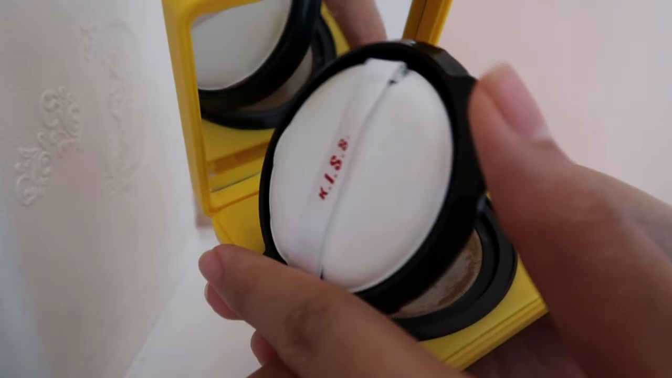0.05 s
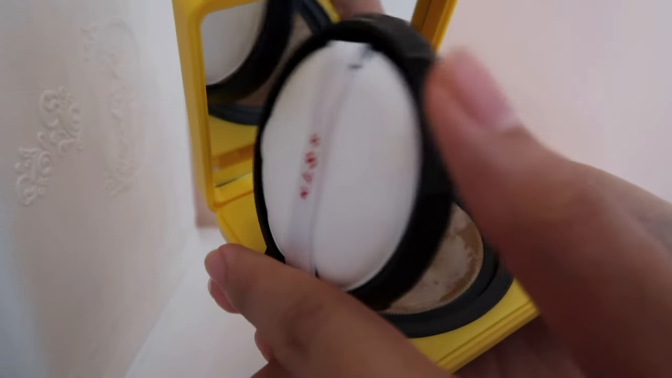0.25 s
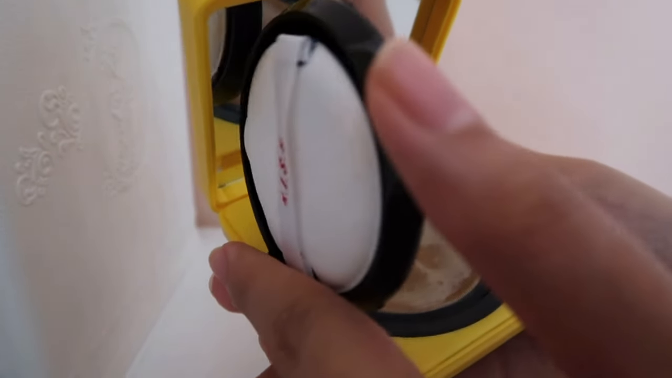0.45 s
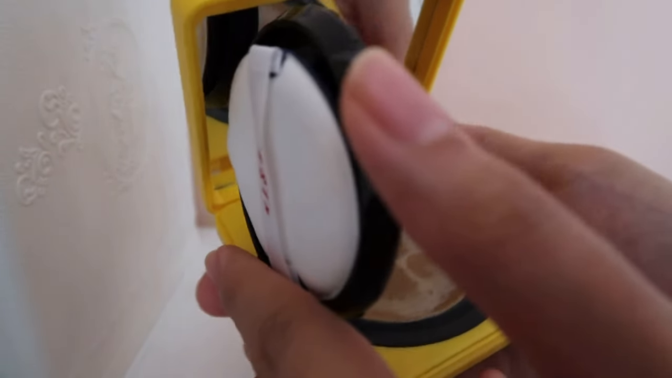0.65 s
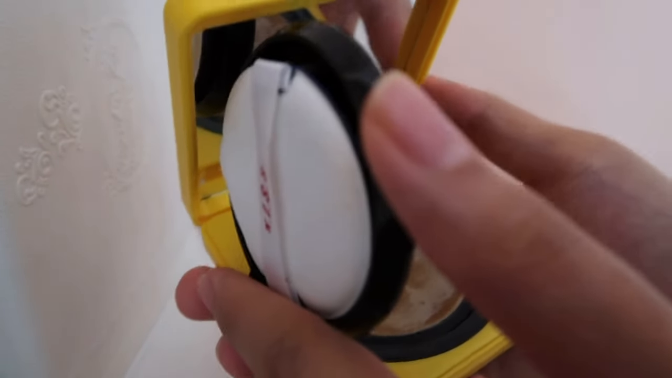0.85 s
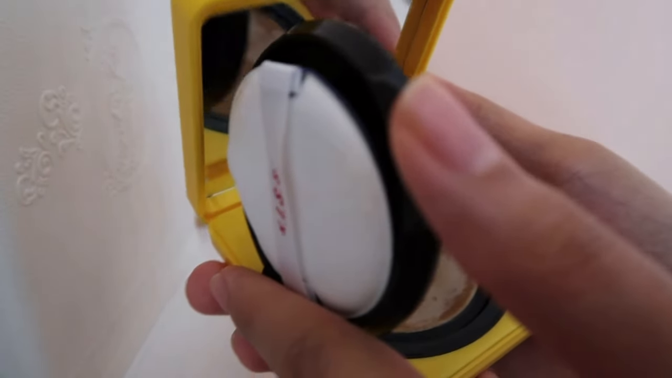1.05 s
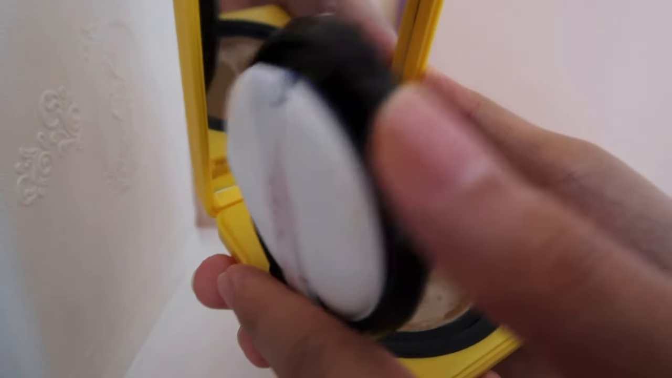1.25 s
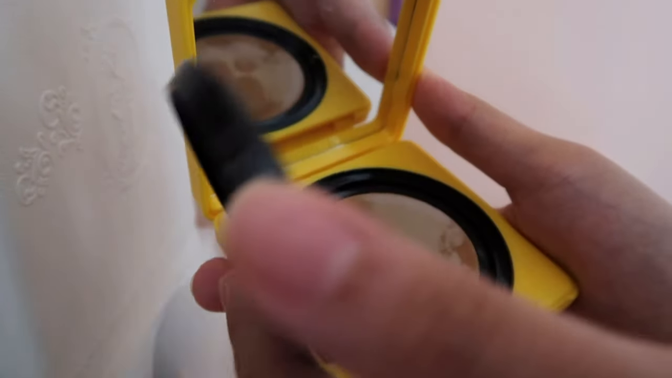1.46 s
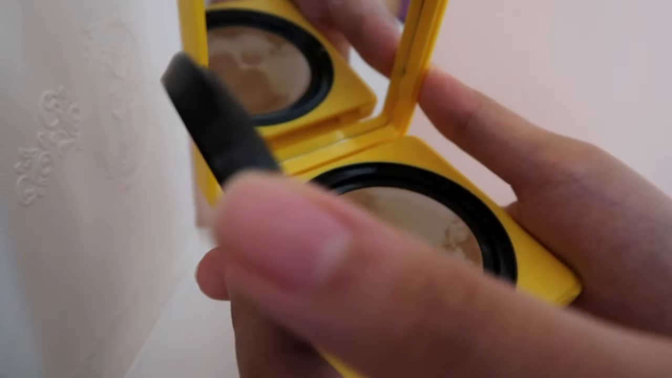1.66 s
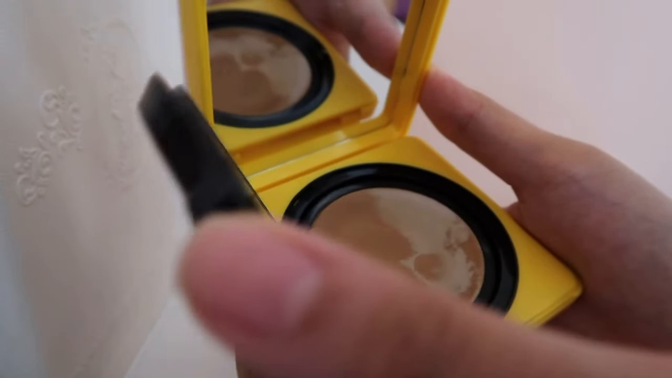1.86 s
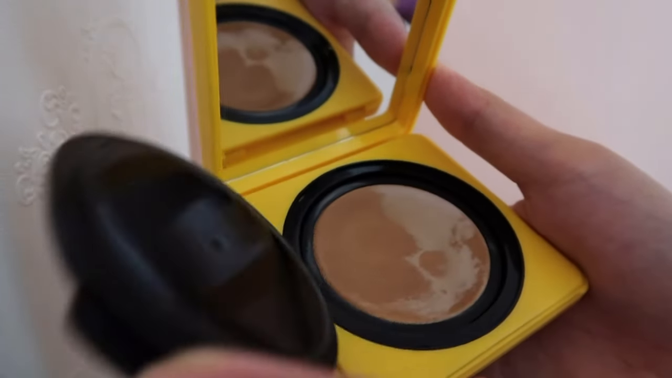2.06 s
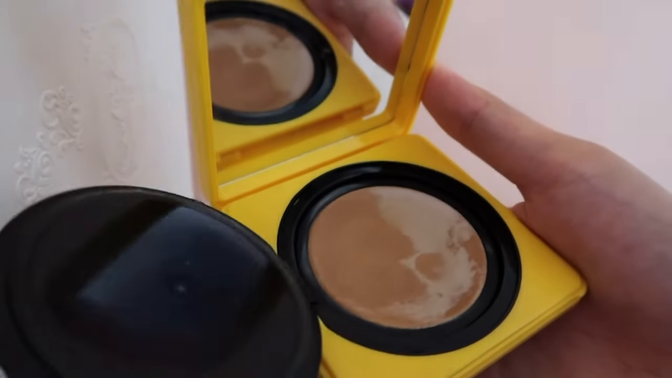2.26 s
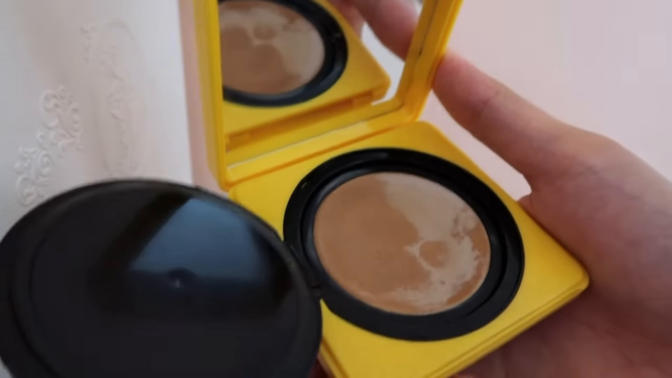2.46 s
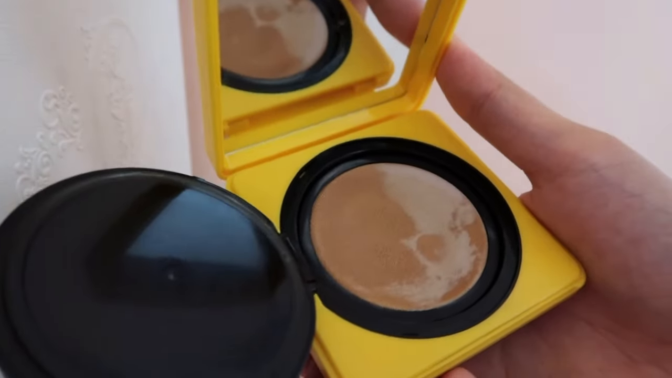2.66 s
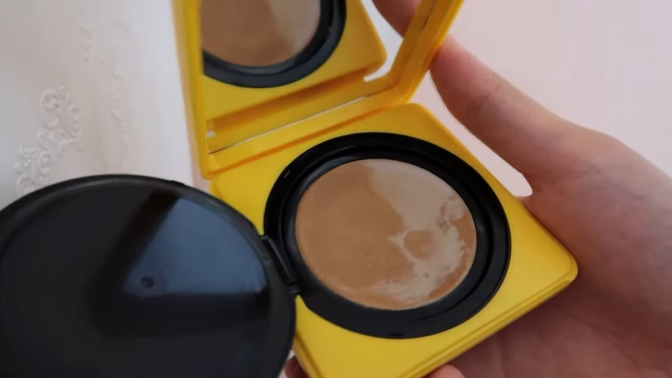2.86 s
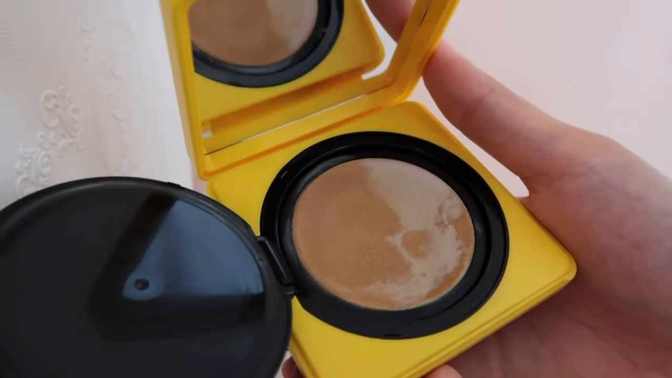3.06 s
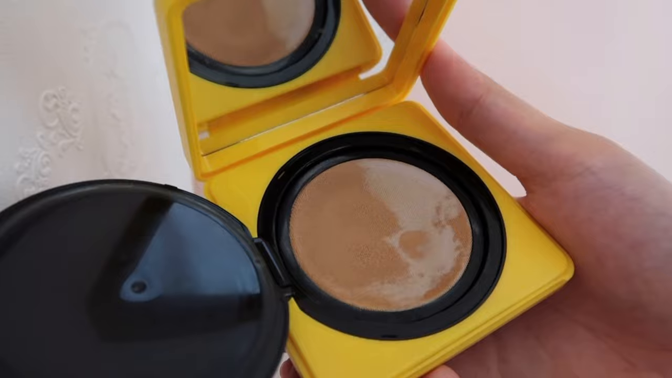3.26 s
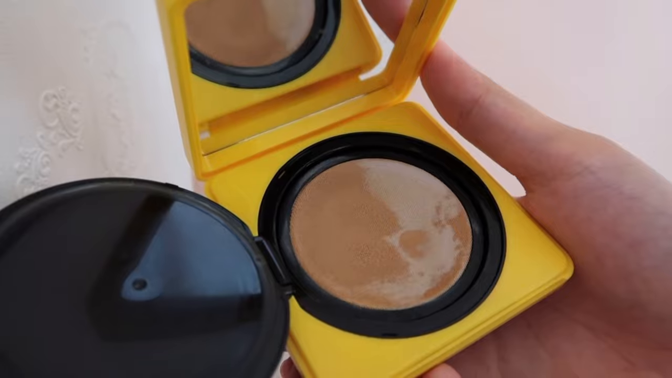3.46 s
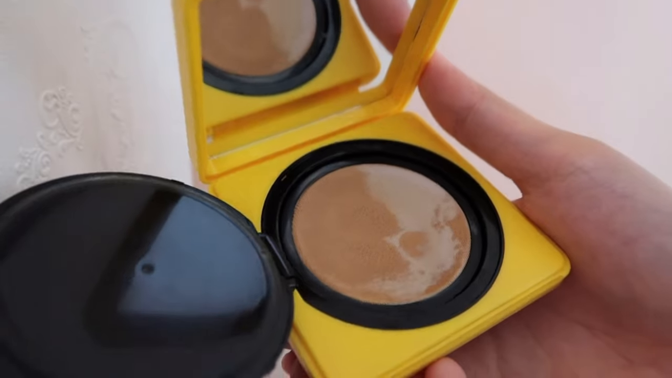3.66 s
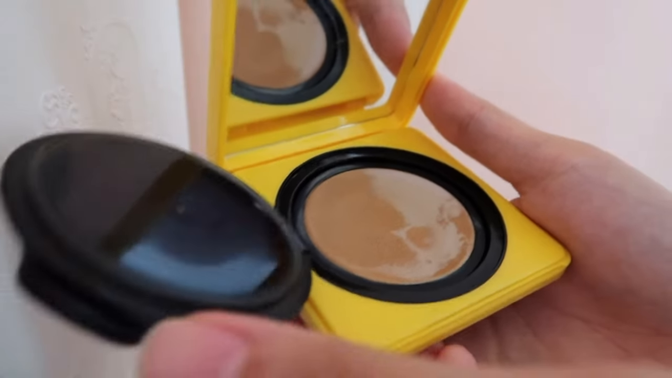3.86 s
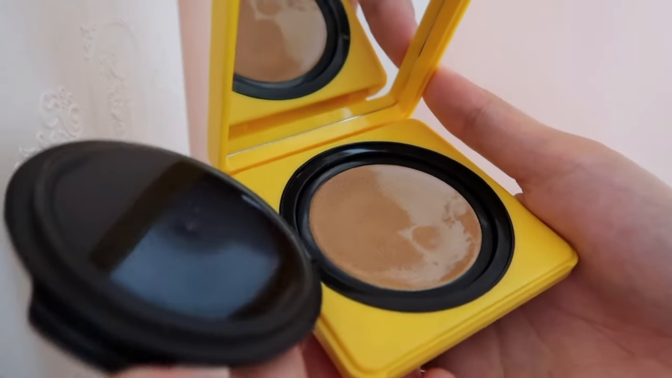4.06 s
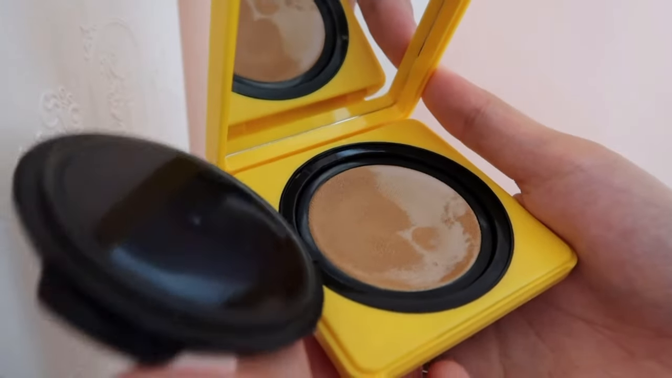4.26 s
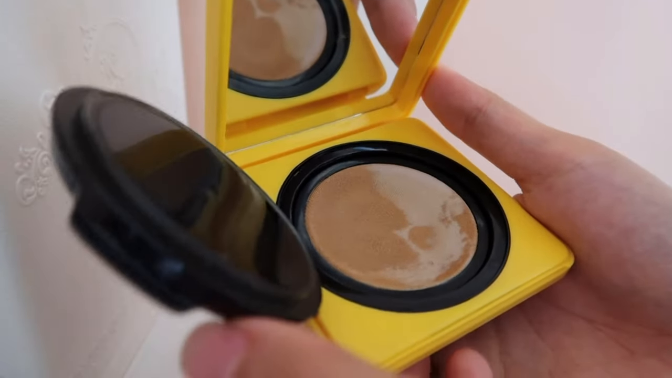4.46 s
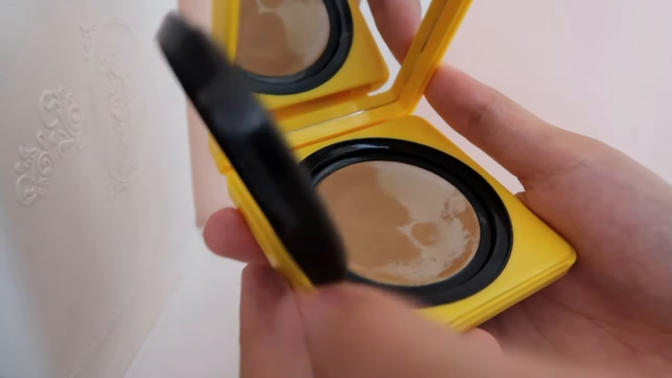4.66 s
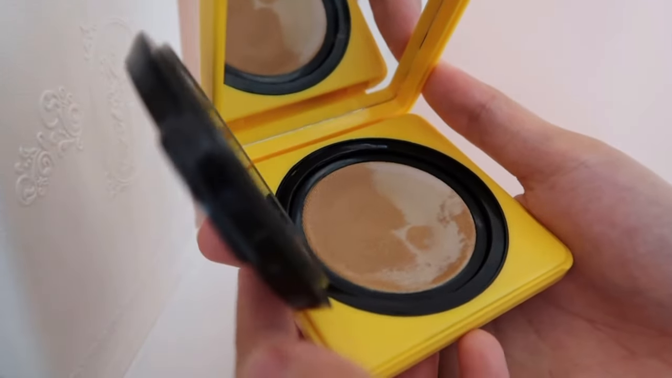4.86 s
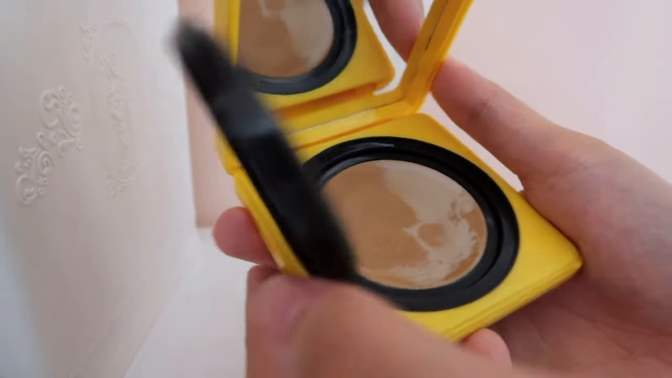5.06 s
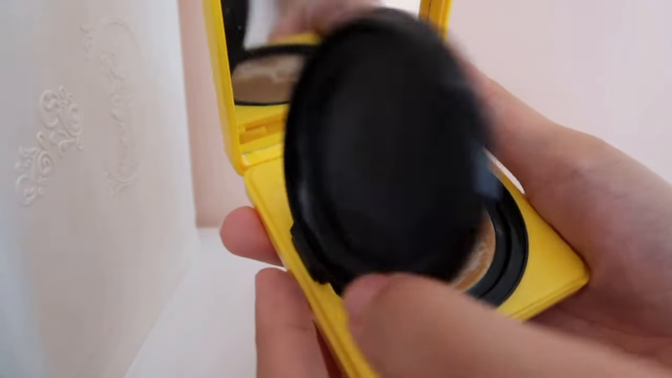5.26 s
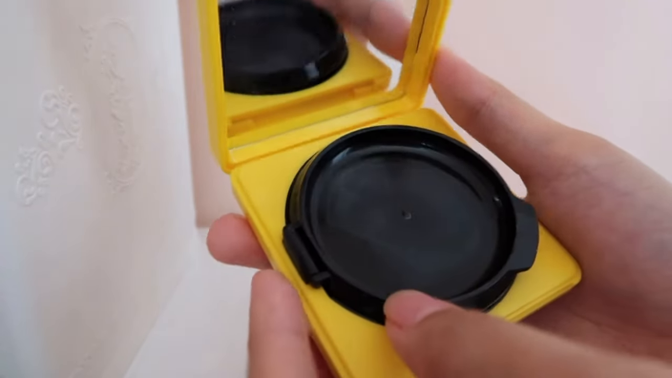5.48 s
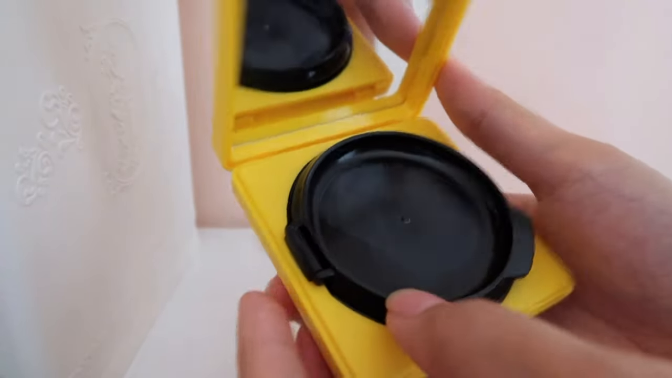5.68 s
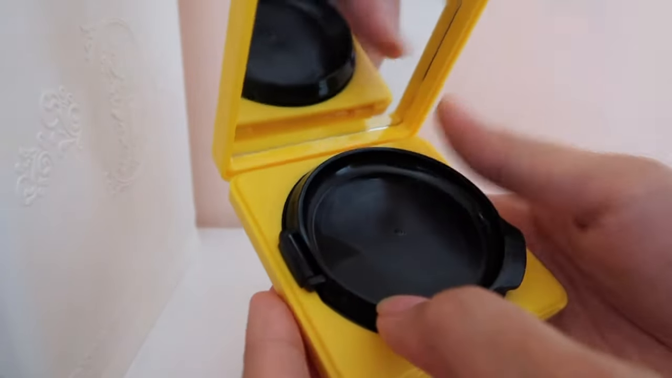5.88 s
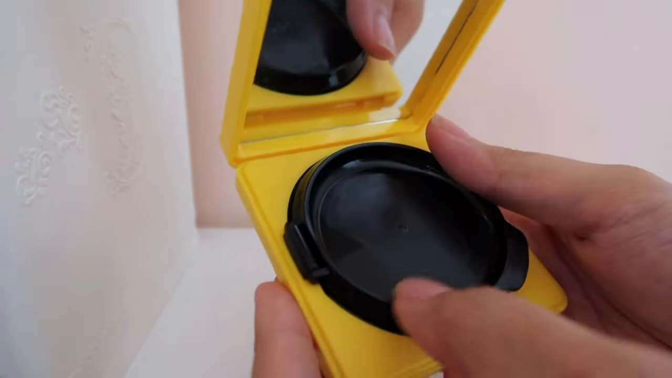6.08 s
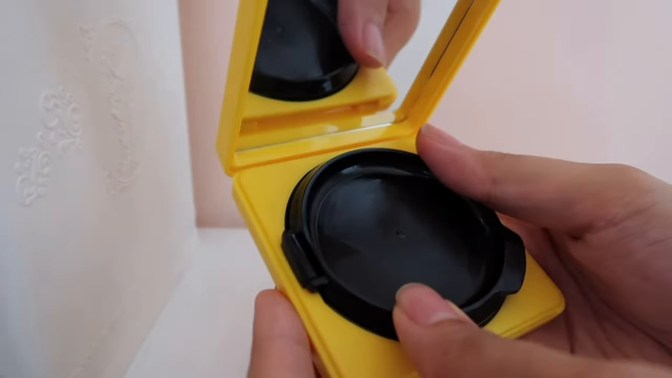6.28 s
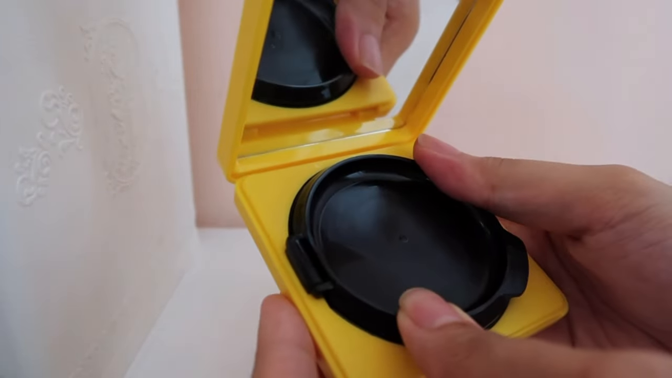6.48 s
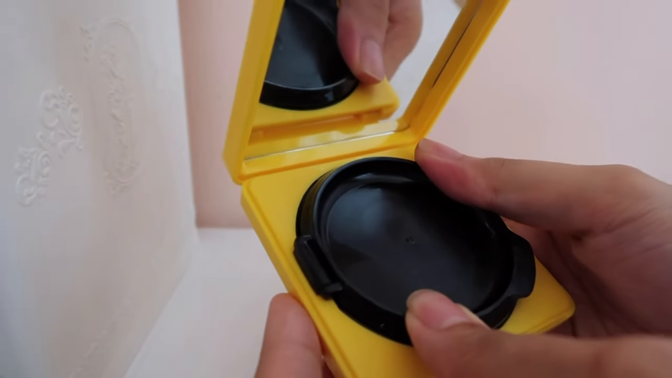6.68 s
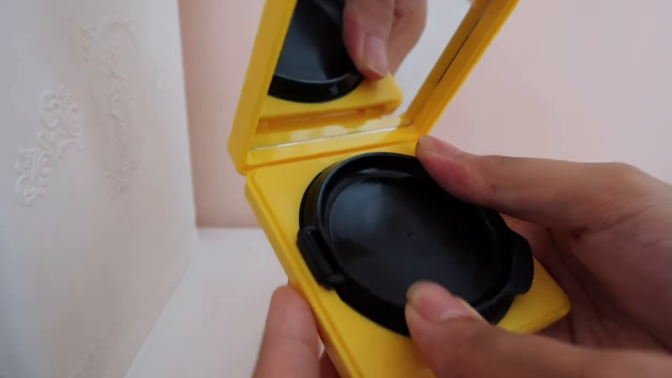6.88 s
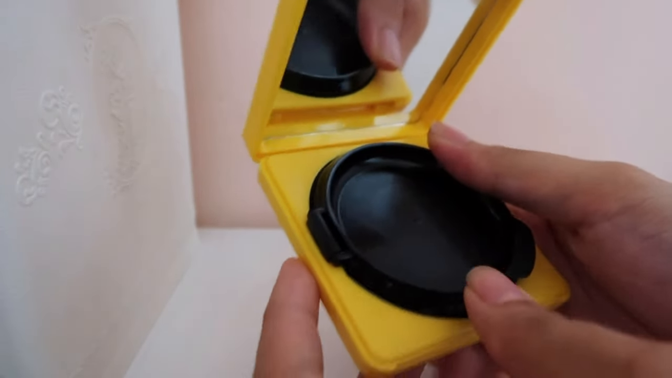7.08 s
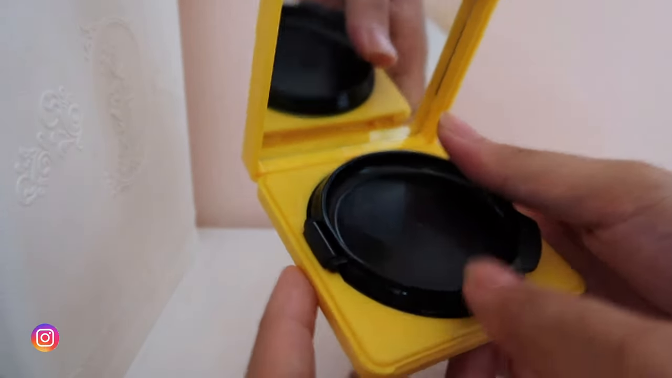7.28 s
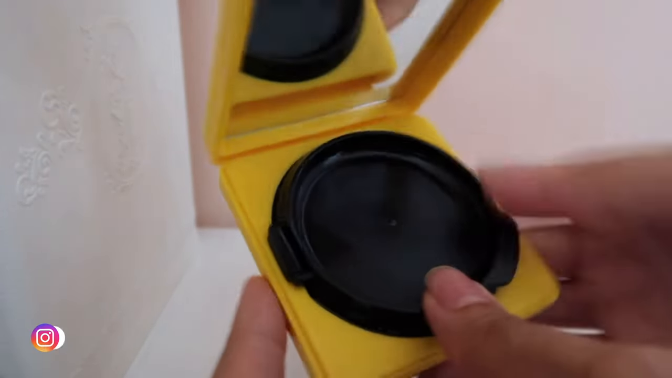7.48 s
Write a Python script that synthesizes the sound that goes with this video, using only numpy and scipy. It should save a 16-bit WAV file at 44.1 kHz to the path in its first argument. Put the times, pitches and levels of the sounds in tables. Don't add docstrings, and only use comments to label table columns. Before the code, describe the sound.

A cooling unit hums low with a soft rush of air throughout, in a small room. Close to a stereo microphone, fingers handle a hollow plastic makeup compact: a few faint ticks and dull knocks, a long pause, then more knocks and a short scrape before the inner lid snaps down hard and bounces. Five springy catch clicks follow, with a tiny high squeak and a last nail tap.

```python
import sys
import numpy as np
from scipy import signal
from scipy.fft import rfft, irfft, next_fast_len
from scipy.io import wavfile
from scipy.ndimage import uniform_filter1d, map_coordinates

SR = 44100
rng = np.random.default_rng(int(sys.argv[2]) if len(sys.argv) > 2 else 0)


def inscribe(sig):
    pcm = np.round(np.clip(np.atleast_2d(sig).T, -1, 1) * 32767)
    wavfile.write(sys.argv[1], SR, pcm.astype(np.int16))


def elevation(decibels):
    levels = np.asarray(decibels, float)
    return 10 ** (levels / 20)


N = 332073
TOP_HZ = 15300

# (frequency [Hz], density [dB per Hz])
RUMBLE = [(10, -40), (18, -29), (40, -6), (60, -11.5), (85, 2), (110, -5.5), (150, 4), (200, -1), (250, -6),
          (330, -7.5), (450, -13.5), (600, -18.5), (800, -40), (1300, -120)]
RUSH = [(210, -36), (350, -5.5), (373, -3.5), (406, -4), (521, -7), (566, -9), (657, -9.5), (721, -10.5),
        (859, -7), (1140, -11), (1430, -17), (1740, -13.5), (3200, -34.5), (4160, -42), (7040, -120)]
HISS = [(1290, -20.5), (2200, -1.5), (2310, -10), (2510, -4.5), (6980, -21), (12700, -30.5), (14700, -34),
        (16000, -56)]
RUMBLE_DB, RUSH_DB, HISS_DB = -39, -44.5, -59
DRIFT_DB, FLUTTER_DB = 0.35, 0.55

# (frequency [Hz], side minus mid [dB])
DIFFUSE = [(60, -40), (110, -30), (200, -26.5), (380, -15), (700, -17), (1290, -14.5), (2380, -9.5),
           (4400, -2.5), (8120, -1.5), (15000, 2.5)]
NEAR = [(200, -24), (1000, -22), (2400, -20), (4400, -10), (8000, -5), (12000, 2), (15000, 3)]
# (frequency [Hz], t60 [s])
ROOM_DECAY = [(500, 0.26), (2000, 0.19), (6000, 0.39), (13000, 0.24)]

MAINS_HZ, SHAFT_HZ, FAN_HZ = 119.77, 28.09, 13.587
# (mains multiple [1], shaft multiple [1], rms level [dB])
HUM = [(1, -1, -51.5), (0, 4, -60.5), (1, 0, -50.5), (1, 2, -57), (1, 3, -49.5), (2, -1, -50), (1, 4, -48),
       (1, 5, -61), (2, 1, -49.5), (2, 2, -54), (2, 3, -48.5), (2, 5, -56), (3, 4, -59.5), (4, 2, -61.5),
       (4, 7, -63), (6, 2, -61), (6, 4, -60.5), (6, 6, -59), (6, 15, -61), (7, 14, -65.5)]
# (fan multiple [1], rms level [dB])
FAN = [
    (2, -77),
    (3, -58.5),
    (4, -59.5),
]
# (frequency [Hz], rms level [dB])
COMB = [(60, -82), (200, -58), (450, -72.5), (750, -77), (1150, -71), (1400, -78.5), (1900, -91)]

# (frequency [Hz], width [Hz], level [dB])
PLATE_MODES = [(1300, 430, 2), (2600, 340, 1), (3300, 520, -5), (5500, 2400, -4), (8800, 1500, -5),
               (10900, 1200, -18), (13000, 1200, -9.5)]
EDGE_MODES = [(4600, 2300, 8.5), (6500, 1100, 10), (9000, 2200, 5), (12600, 2500, -2), (15100, 1700, 3)]
SHELL_MODES = [(646, 76, 12.5), (930, 190, 8), (1360, 120, 1), (2790, 590, -5)]
LID_MODES = [(480, 260, -15), (900, 130, -22), (1670, 72, 7.5), (2100, 370, 8), (2420, 530, 2),
             (3520, 270, -10), (5100, 500, -17), (6100, 640, -21), (8600, 430, -21), (12500, 3000, -25)]
SEATED_MODES = [(900, 110, -20), (1710, 110, 0), (2400, 500, -17), (3500, 340, -14)]
CATCH_MODES = [(1090, 1200, -13), (1960, 250, -8.5), (2595, 58, 8), (3280, 180, -6.5), (3720, 140, -2.5),
               (4850, 400, -21), (5700, 460, -13.5), (9050, 500, -16.5), (11700, 600, -28),
               (14000, 1500, -33)]

# (time [s], peak level [dB], contact [ms])
NAIL_TAPS = [
    (0.7432, -31, .09),
    (4.616, -29.5, 0.059),
    (4.8246, -33, 0.016),
    (6.3905, -47, .005),
    (7.4512, -21.5, 0.0046),
]
REBOUND_MS, REBOUND_DB = 1.26, -4.5

# (time [s], peak level [dB], ring frequency [Hz])
TICKS = [(0.7435, -41, 2640), (1.592, -34, 1300), (1.594, -43.5, 3650), (1.648, -37.5, 2700),
         (1.648, -40, 3450), (1.649, -48, 3870), (4.616, -44, 6600), (4.677, -47, 4250),
         (4.8242, -34.5, 2100), (4.832, -37, 3380), (4.8365, -35.5, 3370), (4.837, -44, 4900),
         (4.863, -50, 5500), (5.115, -44, 2800), (5.836, -54, 5100), (6.3607, -43, 5100),
         (6.3905, -43, 5470), (6.4717, -51, 6500), (6.527, -53, 5000), (6.9794, -54, 4500),
         (7.036, -40.5, 2820), (7.0814, -50, 5500), (7.148, -55, 6500), (7.3587, -42.5, 4020),
         (7.4134, -50, 4000)]
TICK_HZ, RIM_DB, RIM_DB_PER_OCTAVE = 3000, -12, 5
RATTLE_MS, CRACK_MS, KNOCK_MS = 2.0, 1.5, 0.4

# (time [s], peak level [dB], frequency [Hz], width [Hz])
KNOCKS = [(.744, -35, 900, 300), (1.649, -25, 704, 300), (4.185, -31, 930, 60), (4.235, -38, 970, 80),
          (4.6167, -23.5, 795, 400), (4.6751, -25, 735, 200), (4.7075, -27, 616, 130),
          (4.828, -26, 900, 70), (5.103, -29, 990, 150), (5.109, -29, 730, 90), (5.119, -33, 550, 250),
          (5.4904, -25.5, 470, 100)]

# (peak time [s], rise [ms], fall [ms], level [dB])
SKIN_DRAGS = [
    (4.74, 100, 12, -43),
    (4.875, 15, 45, -46),
    (5.123, 30, 4.5, -32),
    (6.81, 10, 71, -45),
]
# (peak time [s], rise [ms], fall [ms], level [dB], squeak frequency [Hz])
SQUEAKS = [
    (4.875, 15, 45, -64, 9000),
    (5.123, 22, 4.6, -40, 6600),
    (5.13, 12, 65, -55, 13000),
    (5.84, 30, 20, -64, 7500),
    (6.791, 1.5, 13, -47, 11800),
    (6.798, 0.83, 4.4, -27, 12600),
    (6.81, 8.6, 87, -50.5, 12500),
    (7.165, 30, 40, -61, 5000),
]
# (time [s], peak level [dB], ring frequency [Hz], rim level [dB])
CRACKS = [
    (5.1244, -30, 4700, 0),
    (6.798, -34, 4750, 0),
]

# (time [s], peak level [dB], contact [ms], free ring [ms])
SNAP = [
    (5.4883, -20, .04, 1.5),
    (5.4903, -4, .03, 1.5),
]
BOUNCES = [
    (5.49225, -9.5, .05, 2.6),
    (5.4991, -22, .06, 2.5),
]
CATCH_PRESSES = [
    (6.4851, -24.5, .06, 3.8),
    (6.5513, -25.5, .054, 4),
    (6.6116, -19, .036, 3.8),
    (6.7053, -16, .012, 3.8),
    (6.8037, -16, .033, 3.8),
]


def unit(x):
    return x / np.sqrt(np.mean(x ** 2) + 1e-20)


def along(points, hz):
    f, v = np.transpose(points)
    return np.interp(np.log(hz + 1), np.log(f + 1), v)


def wobble(rate):
    knots = rng.standard_normal(int(N * rate / SR) + 4)
    return map_coordinates(knots, [np.arange(N) * rate / SR])


def filtered(x, response):
    size = next_fast_len(x.shape[-1] + 4096)
    spectrum = rfft(x, size) * response(np.fft.rfftfreq(size, 1 / SR))
    return irfft(spectrum, size)[..., :x.shape[-1]]


def body(modes):
    def response(f):
        total = 0
        for k, (centre, width, db) in enumerate(modes):
            damping = 1j * f * width
            total = total + (-1) ** k * elevation(db) * damping / (centre * centre - f * f + damping)
        return total
    return response


def add(track, s, sound):
    spot = track[round(s * SR):][:len(sound)]
    spot += sound[:len(spot)]


def diffuse(spectrum):
    def response(f):
        return elevation(along(spectrum, f) + [0 * f, along(DIFFUSE, f)])
    pair = filtered(rng.standard_normal((2, N)), response)
    return pair / np.std(pair[0])


def air():
    drift_db = DRIFT_DB * wobble(1.13)
    out = np.zeros((2, N))
    for db, shape in ((RUMBLE_DB, RUMBLE), (RUSH_DB, RUSH), (HISS_DB, HISS)):
        out += elevation(db + drift_db + FLUTTER_DB * wobble(5.1)) * diffuse(shape)
    return out


def compressor():
    lines = [(m * MAINS_HZ + k * SHAFT_HZ, db) for m, k, db in HUM]
    lines += [(k * FAN_HZ, db) for k, db in FAN]
    strong = {(m, k) for m, k, db in HUM}
    for m in range(13):
        for k in range(-2, 16):
            hz = m * MAINS_HZ + k * SHAFT_HZ
            if (m, k) not in strong and hz > 40:
                lines.append((hz, along(COMB, hz) + rng.normal(0, 3.14)))
    size = next_fast_len(N)
    bins = np.zeros((2, size // 2 + 1), complex)
    for hz, db in lines:
        phase = np.exp(2j * np.pi * rng.random(2))
        bins[:, round(hz * size / SR)] += elevation([db, db + along(DIFFUSE, hz)]) * phase
    return irfft(bins, size)[:, :N] * size / np.sqrt(2)


def strike(modes, contact_ms, rattle_ms=0, free_ms=20):
    ms = np.arange(2048) / SR * 1000
    rattle = 0.75 * rng.standard_normal(len(ms)) * np.exp(-ms / max(rattle_ms, 1e-3))
    force = (ms == 0) + rattle
    ring = filtered(force, lambda f: body(modes)(f) / (1 + 2j * np.pi * f * contact_ms / 1000) ** 2)
    ring = ring * (0.07 + 0.93 * np.exp(-(ms / free_ms) ** 4))
    ring = ring * (1 - np.exp(-ms / 0.14))
    return ring / np.abs(ring).max()


def nail_taps():
    out = np.zeros(N)
    for s, db, contact_ms in NAIL_TAPS:
        add(out, s, elevation(db) * strike(PLATE_MODES, contact_ms))
        add(out, s + REBOUND_MS / 1e3, elevation(db + REBOUND_DB) * strike(PLATE_MODES, 2 * contact_ms))
    return out


def tick(hz, rim_db, rattle_ms):
    spot = strike([(hz, 0.054 * hz, 0)], 0.029, rattle_ms)
    return spot + elevation(rim_db) * strike(EDGE_MODES, 0.0053, rattle_ms)


def small_ticks():
    out = np.zeros(N)
    for s, db, hz in TICKS:
        rim_db = RIM_DB + RIM_DB_PER_OCTAVE * np.log2(hz / TICK_HZ)
        add(out, s, elevation(db) * tick(hz, rim_db, RATTLE_MS * min(hz / TICK_HZ, 1)))
    return out


def finger_knocks():
    out = np.zeros(N)
    for s, db, hz, width in KNOCKS:
        add(out, s, elevation(db) * strike([(hz, width, 0)], 0.14, KNOCK_MS))
    return out


def room(x):
    out, step = np.zeros((2, N + SR)), SR // 4

    def dull(f):
        return 1 / (1 + 1j * f / 5000) ** 2

    for start in range(0, N, step):
        hz, t, z = signal.stft(rng.standard_normal((2, SR // 3)), SR, nperseg=256)
        colour_db = np.array([0 * hz, along(DIFFUSE, hz)])[:, :, None]
        decay_db = 60 * t / along(ROOM_DECAY, hz)[:, None]
        tail = signal.istft(z * elevation(colour_db - decay_db), SR, nperseg=256)[1]
        tail = filtered(tail / np.linalg.norm(tail[0]), dull)
        wet = signal.fftconvolve(x[None, start:start + step], tail, axes=1)
        out[:, start + 90:][:, :wet.shape[1]] += wet
    return out[:, :N]


def rim_modes(hz):
    return [(hz, 0.08 * hz, 0), (1.1 * hz, 0.1 * hz, -6), (0.71 * hz, 0.26 * hz, -10), (0.14 * hz, 0.4 * hz, -6)]


def scrapes():
    out = np.zeros(N)
    t = np.arange(-SR // 10, SR // 5) / SR
    strokes = [(*row, SHELL_MODES) for row in SKIN_DRAGS]
    strokes += [(*row, rim_modes(hz)) for *row, hz in SQUEAKS]
    for s, rise, fall, db, modes in strokes:
        swell = np.exp(np.where(t < 0, 1950.0 * t / rise, -2e3 * t / fall))
        grain_db = 2.0 * unit(uniform_filter1d(rng.standard_normal(len(t)), 40))
        grit = rng.standard_normal(len(t)) * elevation(grain_db)
        add(out, s + t[0], swell * elevation(db) * unit(filtered(grit, body(modes))))
    return out


def cracks():
    out = np.zeros(N)
    for s, db, hz, rim_db in CRACKS:
        add(out, s, elevation(db) * tick(hz, rim_db, CRACK_MS))
    return out


def hard_contacts(table, modes):
    out = np.zeros(N)
    for s, db, contact_ms, free_ms in table:
        add(out, s, elevation(db) * strike(modes, contact_ms, free_ms=free_ms))
        crackle_db = db - 17 - 260 * contact_ms
        add(out, s, elevation(crackle_db) * strike(EDGE_MODES, 0.0098, rattle_ms=3.4))
    return out


def lid_snap():
    return hard_contacts(SNAP, LID_MODES) + hard_contacts(BOUNCES, SEATED_MODES)


def catch():
    return hard_contacts(CATCH_PRESSES, CATCH_MODES)


def scene():
    case = nail_taps() + small_ticks() + finger_knocks() + scrapes() + cracks() + lid_snap() + catch()
    side = filtered(case, lambda f: 1j * elevation(along(NEAR, f)))
    mid, side = np.array([case, side]) + elevation(-8) * room(case) + air() + compressor()
    return np.array([mid + side, mid - side])


def low_pass(x):
    return signal.sosfilt(signal.butter(12, 16340, fs=SR, output="sos"), x)


def record(dry):
    stop = np.clip((N - np.arange(N)) / 130, 0, 1)
    mix = filtered(dry * stop, lambda f: 1 / (1 + (f / TOP_HZ) ** 40))
    return low_pass(mix)


dry = scene()
out = record(dry)
inscribe(out)
```